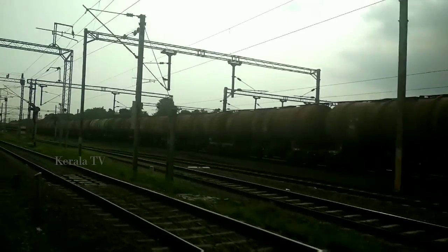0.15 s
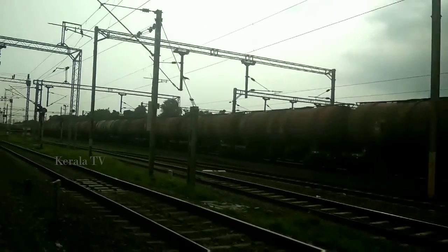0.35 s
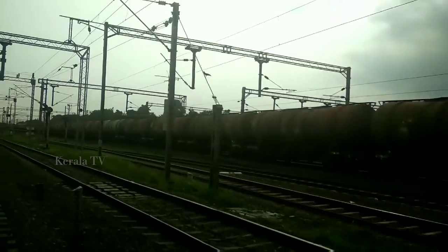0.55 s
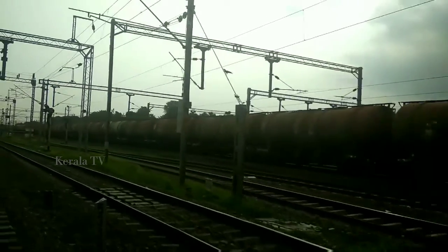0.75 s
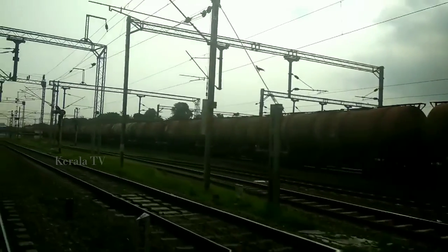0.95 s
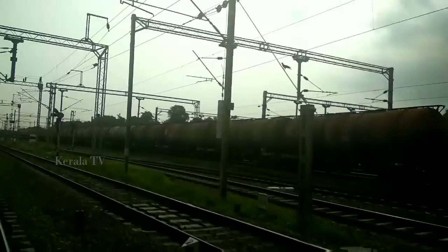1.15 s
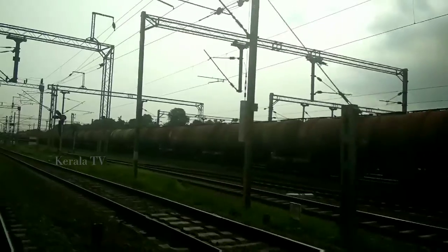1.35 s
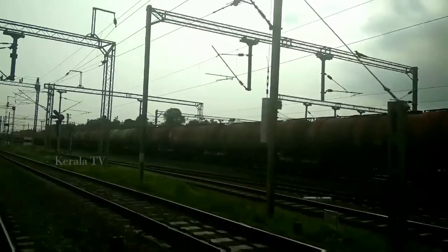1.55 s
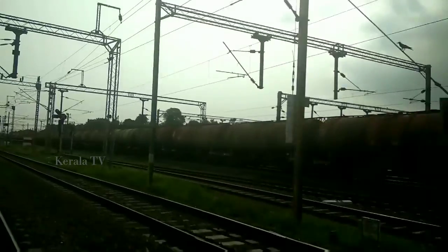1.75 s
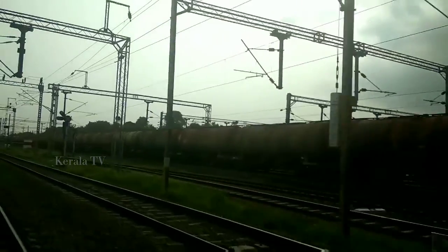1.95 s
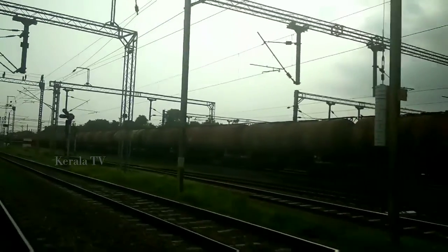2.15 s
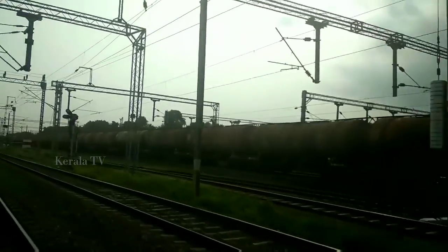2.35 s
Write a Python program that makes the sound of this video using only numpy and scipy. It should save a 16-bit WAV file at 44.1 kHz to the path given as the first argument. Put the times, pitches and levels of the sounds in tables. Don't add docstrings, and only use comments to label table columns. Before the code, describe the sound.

Strong gusts thump an exposed stereo microphone mid-way, slapping mostly on the right, then die away; beneath, train wheels thud and ring over rail joints with bright flange hiss and faint high squeals outdoors.

```python
import sys
import numpy as np
from scipy import signal
from scipy.fft import rfft, irfft
from scipy.io import wavfile
from scipy.ndimage import uniform_filter1d

SR = 44100
rng = np.random.default_rng(int(sys.argv[2]) if len(sys.argv) > 2 else 0)


def unload_wav(signal):
    wavfile.write(
        sys.argv[1],
        SR,
        np.round(np.clip(np.atleast_2d(signal).T, -1, 1) * 32767).astype(np.int16),
    )


def invert_db(level):
    return 10 ** (np.asarray(level, dtype=float) / 20)


N = 105840
CLANK_ATTACK_S = 0.008


def rms_one(x):
    return x / np.sqrt(np.mean(x ** 2, axis=-1, keepdims=True) + 1e-20)


def coloured(x, points):
    hz, db = np.transpose(points)
    f = np.maximum(np.fft.rfftfreq(x.shape[-1], 1 / SR), 1)
    low_edge = np.minimum(f / hz[0], 1) ** 2
    gain = invert_db(np.interp(np.log(f), np.log(hz), db)) * low_edge
    return rms_one(irfft(rfft(x) * gain, x.shape[-1]))


def drift(rate_hz):
    hop = 40
    r = np.exp(-2 * np.pi * rate_hz * hop / SR)
    noise = rng.standard_normal(N // hop + 2002)
    slow = signal.lfilter([1], [1, -2 * r, r * r], noise)[2000:]
    return np.interp(np.arange(N) / hop, np.arange(len(slow)), rms_one(slow))


def follow(points):
    return np.interp(np.arange(N) / SR, *np.transpose(points))


def resonate(x, hz, width_hz):
    r = np.exp(-np.pi * width_hz / SR)
    section = [0.97, 0.0049, -1, 1, -2 * r * np.cos(2 * np.pi * hz / SR), r * r]
    return rms_one(signal.sosfilt([section] * 2, x))


def evened(x, share, span_s):
    power = uniform_filter1d(x * x, size=int(span_s * SR), axis=-1)
    return rms_one(x / (power + 0.0073) ** (share / 2))


def blow(start_s, attack_s, hold_s, t60_s):
    t = np.arange(N) / SR - start_s
    release = invert_db(-60 * np.clip(t - attack_s - hold_s, 0, None) / t60_s)
    return np.clip(t / attack_s, 0, 1) ** 2 * release


def pair():
    likeness, left_lag_s = 0.93, 0.00027
    mid, side = rng.standard_normal((2, N))
    both = np.sqrt(1 + likeness) * mid + np.sqrt(1 - likeness) * side * np.array([[1], [-1]])
    return np.array([np.roll(both[0], int(left_lag_s * SR)), both[1]])


def patchy(x):
    patch_db = 1.56
    spectrum = signal.stft(x, nperseg=512)[2]
    field = rng.standard_normal(spectrum.shape)
    for axis, size in ((1, 3), (1, 2), (2, 14), (2, 10)):
        field = uniform_filter1d(field, size=size, axis=axis)
    gain = invert_db(patch_db * field / field.std())
    return signal.istft(spectrum * gain, nperseg=512)[1][:, :N]


def rolling_rumble():
    # frequency in Hz, level in dB per Hz
    rumble_colour = [(35, 13), (100, -7), (210, 4.5), (330, -17.5), (600, -13), (1000, -18.5), (1900, -10)]
    # time in s, level in dB
    roll_swell = [(0, 14.5), (.13, 1.5), (.3, 14), (.5, 9), (.9, 3.5), (1.0, 2), (1.349, -7), (1.7, -2),
                  (1.85, -0.5), (2.052, 2.5), (2.4, 9.5)]
    level_db = -47.5 + follow(roll_swell) + [[1.5], [-1.5]] + 5.4 * drift(1.1)
    return invert_db(level_db) * coloured(rng.standard_normal((2, N)), [*rumble_colour, (3300, -20)])


def flange_hiss():
    top_hz, top_fall_db = 14000, 7
    # frequency in Hz, level in dB per Hz
    hiss_left = [(2000, -12.5), (2700, -6.5), (4600, -9.5), (7500, -3), (9000, -7), (12600, -10)]
    hiss_right = [(2200, -18), (3200, -16), (4000, -12), (7000, -11), (8800, -12.5), (12800, -13.5)]
    # time in s, level in dB
    hiss_swell = [(0, 0.5), (.5, 1.0), (1.2, -0.5), (2.4, 0)]
    # frequency in Hz, width in Hz, left level in dB, right level in dB
    port_modes = [(3480, 850, -40.5, -96), (11240, 1700, -77, -40.5)]
    # time in s, level in dB
    port_swell = [(0, -7), (.19, -3.5), (.23, 0.5), (.6, -1.5), (1.2, 2), (1.7, 0.5), (2.0, -0.5),
                  (2.4, -1)]
    sides = []
    for colour, db in ((hiss_left, -38), (hiss_right, -36)):
        points = [*colour, (top_hz, colour[-1][1] - top_fall_db)]
        sides.append(invert_db(db) * coloured(rng.standard_normal(N), points))
    hiss = np.array(sides)
    for hz, width_hz, left_db, right_db in port_modes:
        level_db = np.array([[left_db], [right_db]]) + drift(8.0) + follow(port_swell) * [[1], [0]]
        hiss = hiss + invert_db(level_db) * resonate(rng.standard_normal((2, N)), hz, width_hz)
    return invert_db(follow(hiss_swell) + 0.5 * drift(47)) * hiss


def squeals():
    fade_s, waver_db, pan_db = 0.068, 0.5, -1.5
    # start in s, end in s, frequency in Hz, width in Hz, level in dB
    squeal_bands = [
        (-.1, 0.493, 6190, 262, -40.5),
        (0.446, 0.956, 5620, 220, -48),
        (0.529, 0.836, 13300, 450, -45.5),
        (1.55, 2.06, 13300, 300, -47),
        (1.973, 2.236, 6130, 220, -46),
        (1.947, 2.335, 2810, 504, -46),
    ]
    out, t = 0, np.arange(N) / SR
    for start, end, hz, width_hz, db in squeal_bands:
        shape = np.clip(np.minimum(t - start, end - t) / fade_s, 0, 1)
        band = resonate(rng.standard_normal((2, N)), hz, width_hz)
        out = out + invert_db(db + waver_db * drift(19)) * shape * band
    return out * invert_db(pan_db * np.array([[1], [-1]]))


def floor_thuds():
    attack_s, t60_s, width_share = 0.01, 0.14, 0.58
    # start in s, hold in s, level in dB, pitch in Hz
    thud_hits = [
        (.004, 0.0041, -26, 228),
        (0.21, 0.04, -21.5, 275),
        (0.229, 0.0044, -16, 144),
        (0.64, 0.029, -12, 173.7),
        (1.827, 0.02, -21.5, 191),
        (1.902, 0.0048, -27.5, 214),
        (2.11, 0.033, -27.5, 185),
        (2.317, 0.015, -26.5, 171),
    ]
    out = 0
    for start, hold_s, db, hz in thud_hits:
        thud = evened(resonate(pair(), hz, hz * width_share), 0.83, 0.018)
        out = out + invert_db(db) * blow(start, attack_s, hold_s, t60_s) * thud
    return out


def wheel_clanks():
    hold_s, ring_t60_s, crash_t60_s, ring_width_hz = 0.018, 0.13, 0.35, 75
    # start in s, level in dB, ring in Hz, upper ring in dB, crash in dB
    clank_hits = [
        (-.006, -35.5, 526, -36, -36.5),
        (0.209, -24, 463, -54, -35),
        (0.638, -19, 418, -37.5, -30.5),
        (1.817, -21.5, 430, -52, -34.5),
        (2.115, -32, 418, -44, -48.5),
        (2.301, -43.5, 506, -53, -43),
    ]
    # frequency in Hz, width in Hz, level in dB
    upper_modes = [(660, 63, 9), (830, 250, 11.5), (937, 360, -13.5)]
    # frequency in Hz, level in dB per Hz
    crash_colour = [(600, -4.5), (1000, -3.5), (1700, -8.5), (2600, -15.5), (3500, -10), (4600, -26),
                    (6000, -53)]
    noise = pair()
    upper = sum(invert_db(db) * resonate(noise, hz, width_hz) for hz, width_hz, db in upper_modes)
    upper = evened(rms_one(upper), 0.55, 0.0055)
    crash = coloured(rng.standard_normal((2, N)), crash_colour)
    out = 0
    for start, db, hz, upper_db, crash_db in clank_hits:
        ring = invert_db(db) * evened(resonate(pair(), hz, ring_width_hz), 0.83, 0.054) + invert_db(upper_db) * upper
        out = out + ring * blow(start, CLANK_ATTACK_S, hold_s, ring_t60_s)
        out = out + invert_db(crash_db) * crash * blow(start, CLANK_ATTACK_S, hold_s, crash_t60_s)
    return out


def wheel_rings():
    hold_s, width_share, min_width_hz = 0.011, 0.086, 60
    # start in s, frequency in Hz, level in dB, t60 in s
    ring_modes = [(0.0, 937, -37.5, 0.11), (0.203, 724, -32, 0.47), (.212, 1180, -43, .15),
                  (.212, 2010, -37, .15), (.212, 3470, -36.5, 0.091), (0.644, 835, -30.5, 0.22),
                  (1.822, 989, -34.5, 0.23), (1.844, 657, -39.5, 0.088), (2.114, 552, -31.5, 0.24),
                  (2.119, 845, -45, 0.23), (2.118, 1145, -49.5, 0.54), (2.304, 975, -36, 0.24),
                  (2.304, 1290, -44, 0.29), (2.304, 723, -52, 0.086), (0.029, 134, -38, 0.38),
                  (0.646, 313, -21.5, 0.31), (.66, 576, -25.5, 0.19), (1.831, 137.7, -32.5, 0.22),
                  (1.86, 77, -44.5, .5), (2.21, 312, -51, 0.47), (0.673, 407, -22.5, 0.069)]
    out = 0
    for start, hz, db, t60_s in ring_modes:
        ring = evened(resonate(pair(), hz, max(hz * width_share, min_width_hz)), 0.95, 0.024)
        out = out + invert_db(db) * blow(start, CLANK_ATTACK_S, hold_s, t60_s) * ring
    return out


def flaps():
    snap_ratio = 2.3
    # centre in s, peak in dB, pitch in Hz, snap in dB
    slaps = [(0.326, -7.5, 480, -25), (.341, -13.5, 380, -30), (0.443, -27, 480, -25),
             (0.787, -18, 330, -25), (.873, -13, 450, -9), (.907, -7.5, 380, -16), (.955, -11, 264, -27),
             (1.103, -18.5, 377, -29), (1.272, -10, 270, -36), (1.409, -9.5, 380, -26),
             (1.751, -9.5, 199, -13.5)]
    out, t = 0, np.arange(N) / SR
    for centre, db, hz, snap_db in slaps:
        for pitch_hz, gain_db in ((hz, db), (hz * snap_ratio, db + snap_db)):
            u = (t - centre) * pitch_hz
            decay = np.where(u < 0, 5.0, 2.5)
            out = out + invert_db(gain_db) * np.sin(2 * np.pi * u) * np.exp(-decay * u * u)
    return np.array([[0], [1]]) * out


def lumps(rate_per_s, hz, size):
    spread_db = 4
    draw = rng.random((2, size))
    height = invert_db(-spread_db * np.log(np.abs(2 * draw[1] - 1) + 0.005)) * np.sign(draw[1] - 0.5)
    kicks = (draw[0] < rate_per_s / SR) * height
    u = np.fft.rfftfreq(size, 1 / SR) / hz
    return rms_one(irfft(rfft(kicks) * 1j * u * np.exp(-u * u / 2.7 - u ** 4 / 8.6), size))


def wind(gusts):
    eddies_per_s, fine_per_s, stretch, evenness, port_low_hz = 260, 670, 1.49, 0.63, 75
    # pitch ratio, level in dB
    eddy_sizes = [(0.501, 8.5), (1.05, 4)]
    out, size = np.zeros(N), 16384
    offset = np.arange(size) - size // 2
    port = signal.butter(2, port_low_hz, "high", fs=SR, output="sos")
    for centre, length_s, db, hz, fine_db in gusts:
        swarm = sum(invert_db(size_db) * lumps(eddies_per_s * ratio, hz * ratio, size)
                    for ratio, size_db in eddy_sizes)
        fine_hz = 480 + 11 * (db + fine_db + 32.5)
        fine = lumps(fine_per_s, 0.69 * max(fine_hz, 250), size)
        shape = np.exp(-np.log(2) * np.abs(2 * offset / SR / (length_s * stretch / 1.665)) ** 3)
        gust = evened(rms_one(signal.sosfilt(port, swarm)), evenness, 0.0313) * shape
        gust = gust * np.sqrt(np.sum(shape ** 2) / np.sum(gust ** 2))
        gust = gust + invert_db(fine_db + 1.0) * evened(fine, evenness, 0.024) * shape
        at = offset + int(centre * SR)
        inside = (at >= 0) & (at < N)
        out[at[inside]] += invert_db(db) * gust[inside]
    return out


def port_gusts():
    # centre in s, length in s, level in dB, eddy pitch in Hz, fine eddies in dB
    gusts_left = [(0.27, 0.024, -38, 150, -17), (0.328, 0.062, -32, 166, -7), (0.37, 0.027, -28, 115, -18),
                  (0.42, 0.047, -25, 150, -21), (0.472, 0.018, -19, 155, -26),
                  (0.509, 0.031, -18.5, 133, -37), (0.559, 0.018, -12, 119, -16),
                  (0.62, 0.057, -32, 102, -14), (0.72, 0.06, -20, 108, -20), (0.794, 0.031, -26, 272, 0),
                  (0.837, 0.22, -23.5, 220, -8), (0.875, 0.1, -16, 144, -15.5),
                  (0.902, 0.039, -36, 157, -27), (0.944, 0.034, -10.5, 161, -21),
                    (0.99, 0.036, -23.5, 110, -24), (1.039, 0.079, -16.5, 112, -44),
                    (1.098, 0.028, -13, 115, -45), (1.151, 0.08, -26, 122, -36.3),
                    (1.229, 0.045, -16.5, 114, -38), (1.298, 0.074, -29, 90, -38),
                    (1.324, 0.23, -38, 126, -35), (1.597, 0.029, -25.5, 175, -36),
                    (1.677, 0.063, -25.5, 116, -28), (1.729, 0.22, -35.5, 112, -27),
                    (1.798, 0.035, -43, 93, -16)]
    gusts_right = [(0.27, 0.037, -41, 170, -16), (0.318, 0.039, -15, 240, -10.5),
                   (0.37, 0.04, -31.5, 236, -1), (0.426, 0.045, -29, 168, -3),
                   (0.51, 0.21, -30.5, 232, -5.5), (0.597, 0.11, -21, 119, -12),
                   (0.71, 0.066, -21.5, 149, -20), (0.777, 0.057, -23.5, 274, -3),
                   (0.838, 0.04, -13.5, 264, -8), (0.874, 0.025, -12.5, 300, -5.5),
                   (0.93, 0.043, -13, 170, -10.5), (1.003, 0.058, -16, 148, -15),
                   (1.05, 0.085, -27.5, 181, -30),
                   (1.102, 0.019, -18.5, 274, -11.5), (1.158, 0.038, -13, 258, -20),
                     (1.195, 0.04, -19, 130, -11), (1.236, 0.073, -15, 282, -14),
                     (1.281, 0.078, -16, 276, -14.5), (1.365, 0.064, -13.5, 139, -15),
                     (1.418, 0.061, -13, 213, -12.5), (1.464, 0.066, -27, 210, -6),
                     (1.51, 0.077, -21, 132, -17.5), (1.61, 0.094, -26.5, 138, -16.5),
                     (1.669, 0.05, -30, 148, -13), (1.768, 0.047, -23, 260, -9),
                     (2.003, 0.029, -34.5, 191, -38),
                   (.4, 0.075, -36, 250, 1.5),
        (1.4, 0.087, -22, 220, -31),
        (1.73, 0.031, -24.5, 197, -33),
        (0.6, .03, -26, 220, -2),
        (1.065, 0.062, -28.5, 205, -32),
        (1.13, 0.033, -24.5, 130, -20),
        (0.39, 0.078, -23.5, 123, -14),
    ]
    left = wind(gusts_left)
    right = wind(gusts_right)
    return np.array([left, right])


def scene():
    rolling = patchy(rolling_rumble() + flange_hiss())
    train = rolling + squeals() + floor_thuds() + wheel_clanks() + wheel_rings()
    return train + flaps() + port_gusts()


def band_limit(x):
    return signal.sosfilt(signal.butter(12, 16940, fs=SR, output="sos"), x)


def record(dry):
    cutoff_hz = 15740
    overloaded = 1.234 * np.tanh(dry / 1.031)
    kept = np.fft.rfftfreq(N, 1 / SR) < cutoff_hz
    return band_limit(irfft(rfft(overloaded) * kept, N))


dry = scene()
out = record(dry)
unload_wav(out)
```